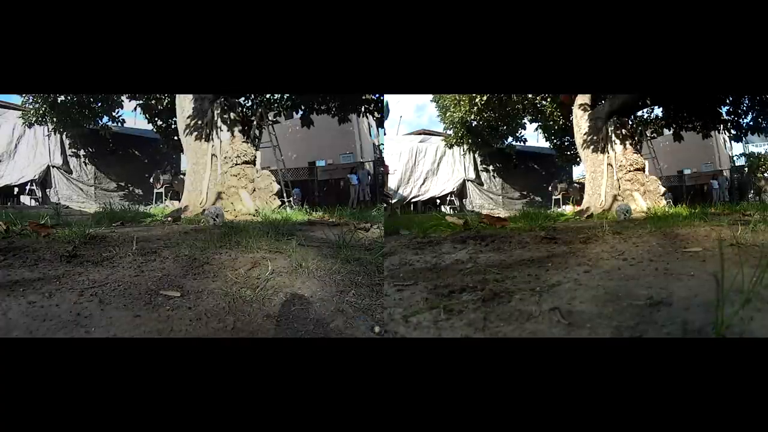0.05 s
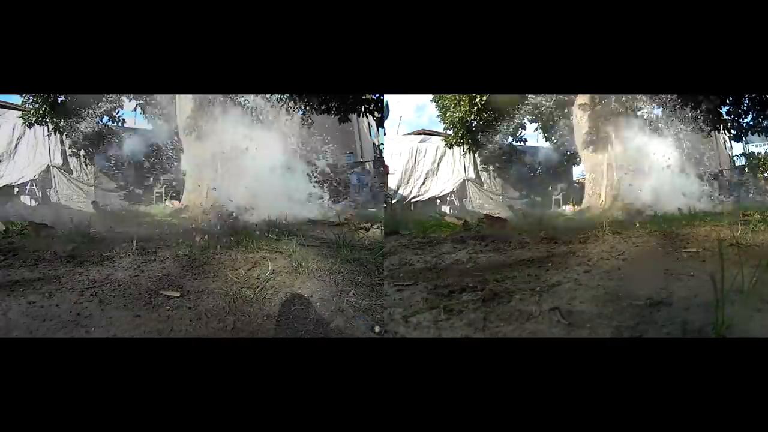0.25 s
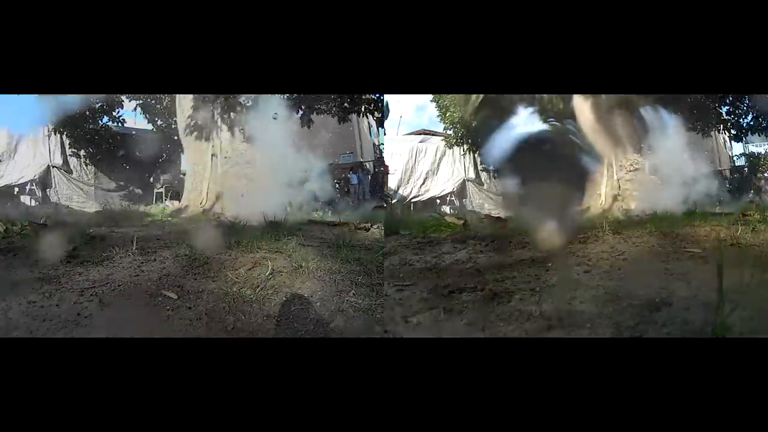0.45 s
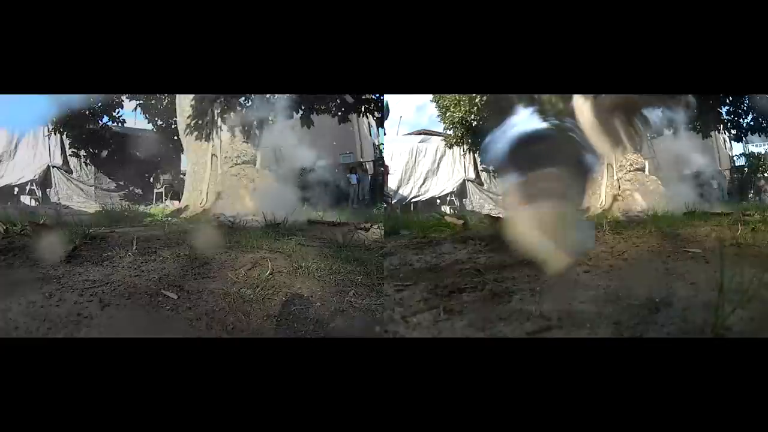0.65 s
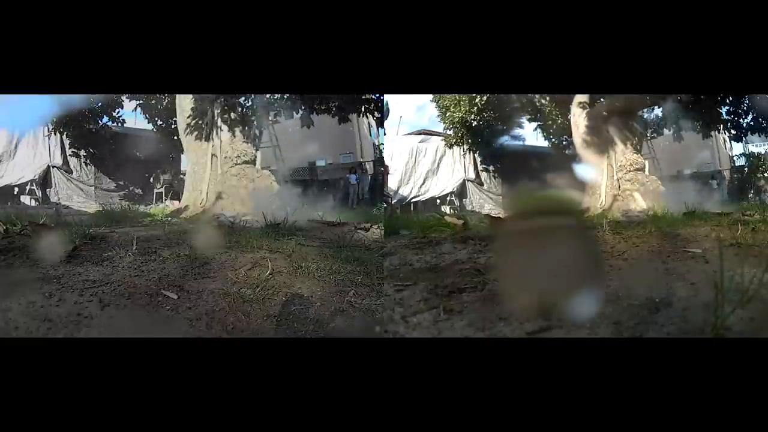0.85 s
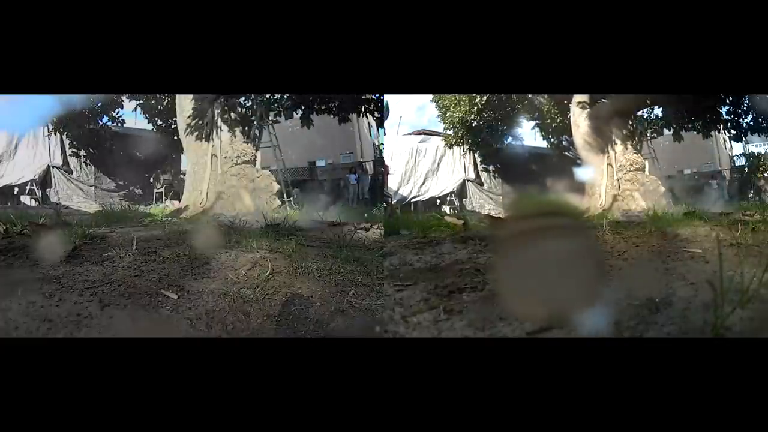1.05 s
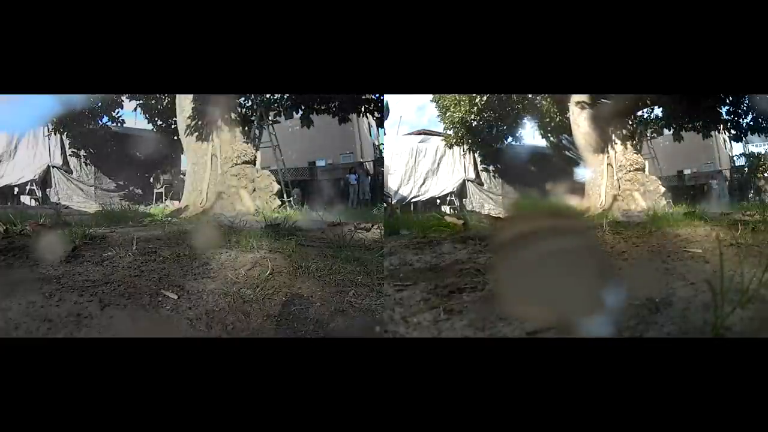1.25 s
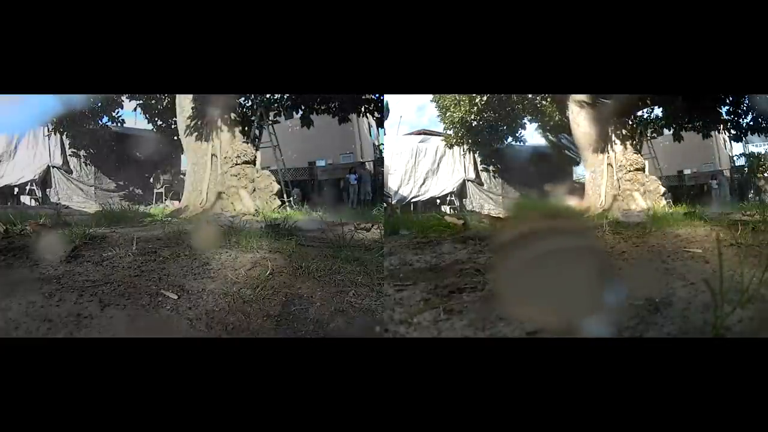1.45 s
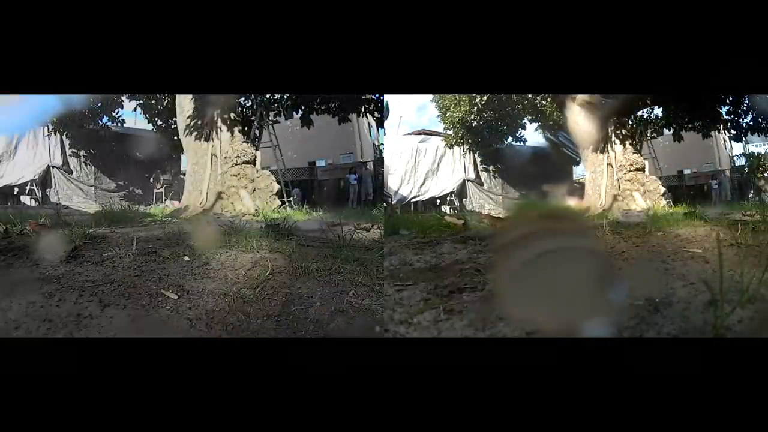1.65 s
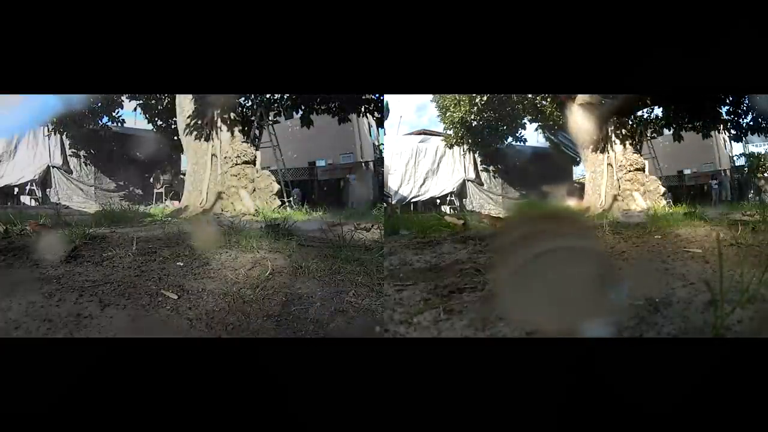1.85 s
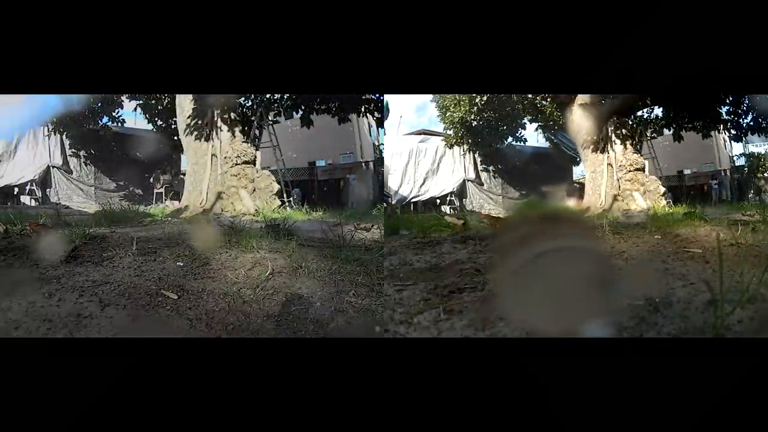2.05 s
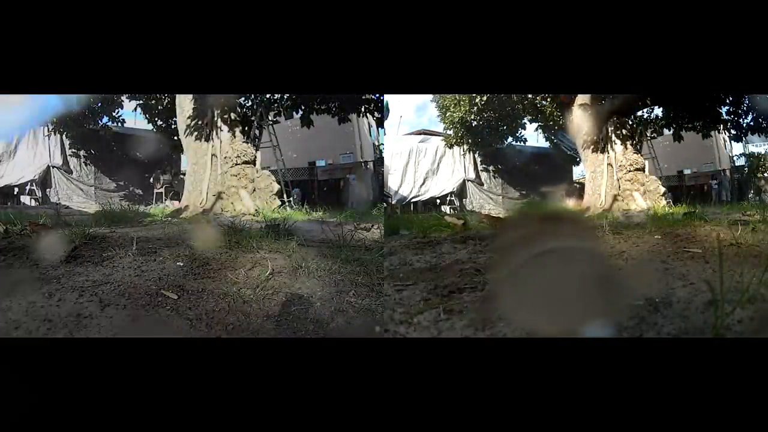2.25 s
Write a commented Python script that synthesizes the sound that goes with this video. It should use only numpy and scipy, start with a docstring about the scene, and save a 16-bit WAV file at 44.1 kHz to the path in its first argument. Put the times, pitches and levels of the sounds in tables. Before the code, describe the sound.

Quiet, faintly hissing yard air until 0.24 s, when a plastic bottle bursts in a very loud, clipped bang with a ringing, boxy edge. A crackling roar and water slap at 0.28 s fade by about 0.7 s over low rumble. Spray hisses while drops tap and click on the microphone housing, with small hollow scrapes and brighter ticks around 1.3-1.65 s, thinning to near silence after 2 s.

```python
"""A plastic bottle of dry ice bursts in a yard, heard inside a waterproof camera housing close by.
The pressure wave overloads a housing resonance; a crackling noise roar sags and dies away round the yard.
Slugs of water strike as low pushes under noise splashes; spray falls as a hiss with ringing droplets.
Drops and scraps click as damped modes, scraps tumble as resonant noise, and low booms and faint
sliding tones are sinusoids under bell-shaped envelopes. Rumble and quiet air are shaped noise."""
import sys
import numpy as np
from scipy import signal
from scipy.fft import rfft, irfft, next_fast_len
from scipy.io import wavfile
from scipy.ndimage import map_coordinates

SR = 44100
rng = np.random.default_rng(int(sys.argv[2]) if len(sys.argv) > 2 else 0)


def master_out(mix):
    """Clip the mix to full scale and print it as 16-bit PCM to the path in sys.argv[1]."""
    frames = np.transpose(np.atleast_2d(mix))
    ceiling = np.clip(frames, -1, 1)
    pcm = np.round(ceiling * 32767).astype(np.int16)
    wavfile.write(sys.argv[1], SR, pcm)


N = 101429
BURST_S, SLAM_S = 0.237, 0.2764  # the burst; the onset of spray and rumble


def amp(db):
    """Decibel law: level in dB to amplitude ratio."""
    return 10 ** (np.asarray(db) / 20)


def unit(x):
    """Normalization to an rms of 1."""
    return x / np.sqrt(np.mean(x ** 2) + 1e-20)


def clock():
    """Uniform sampling: the time of every sample in seconds."""
    return np.arange(N) / SR


def along(points, hz):
    """Interpolation of (frequency, value) points on a logarithmic frequency axis."""
    point_hz, value = np.transpose(points)
    return np.interp(np.log(hz + 1), np.log(point_hz + 1), value)


def wobble(rate):
    """Band-limited fluctuation: a smooth random curve with rate knots a second."""
    knots = rng.standard_normal(int(N * rate / SR) + 4)
    return map_coordinates(knots, [clock() * rate])


def filtered(x, response):
    """Linear filtering: the spectrum of x times a response of frequency."""
    m = next_fast_len(N + SR // 2)
    spectrum = rfft(x, m) * response(np.fft.rfftfreq(m, 1 / SR))
    return irfft(spectrum, m)[..., :N]


def rush(gain, alike):
    """Partly coherent stereo noise of rms 1, with a gain and a left-right correlation per frequency."""
    def mid_side_gain(hz):
        turn = np.arccos(np.clip(along(alike, hz), -1, 1)) / 2
        return gain(hz) * np.array([np.cos(turn), np.sin(turn)])

    mid, side = filtered(rng.standard_normal((2, N)), mid_side_gain)
    return unit(np.array([mid + side, mid - side]))


def colour(points):
    """Spectral shaping: gain per frequency from (pitch_hz, gain_db) points."""
    return lambda hz: amp(along(points, hz))


def resonances(rows):
    """Parallel second-order resonators: the summed response of (pitch_hz, width_hz, gain_db) rows."""
    return lambda hz: sum(amp(db) * 1j * hz * width / (centre ** 2 - hz ** 2 + 1j * hz * width)
                          for centre, width, db in rows)


def held(start, hold, t60):
    """Exponential decay after a sudden start and a hold; t60 is the time to fall 60 dB."""
    t = clock() - start
    return (t >= 0) * amp(-60 * np.maximum(t - hold, 0) / t60)


def hit_level(x):
    """Energy normalization: a hit carries the energy of 10 ms at rms 1."""
    return unit(x) * np.sqrt(SR / 100 / len(x))


TAP_ATTACK_S = 0.0004


def onset(t):
    """Exponential rise of a struck mode."""
    return 1 - np.exp(-t / TAP_ATTACK_S)


def ring(modes, t, rough=0.09):
    """Modal synthesis: damped sinusoids with new levels, phases and slight phase noise at each hit."""
    hz, db, t60 = np.transpose(modes)[:, :, None]
    steps = rng.standard_normal((len(hz), len(t)))
    drift = rough * np.cumsum(steps, axis=1) * np.sqrt(hz / SR) * 2 * np.pi
    decay = amp(db + rng.normal(0, 1.5, hz.shape) - 60 * t / t60)
    waves = decay * np.sin(2 * np.pi * (hz * t + rng.random(hz.shape)) + drift)
    return hit_level(waves.sum(axis=0) * onset(t))


def add(track, s, sound):
    """Superposition: mix a sound into a track at s seconds."""
    part = track[max(round(s * SR), 0):][:len(sound)]
    part += sound[:len(part)]


# Spectrum of the quiet air: pitch_hz, gain_db (relative, per Hz)
AIR_COLOUR = [(15, -32), (25, -7.5), (64, -8), (91, -11.5), (110, -4.5), (227, -7), (331, -9.5),
              (482, -13.5), (970, -22), (1660, -7), (2120, -18), (10600, -27), (15500, -62.5)]
AIR_DB = -54.5


def air():
    """Stationary coloured noise: the quiet air of the yard, more alike left and right in the bass."""
    return amp(AIR_DB) * rush(colour(AIR_COLOUR), [(100, 1.0), (1600, 0.2), (6000, 0.2)])


# Spectrum of the roar: pitch_hz, gain_db (relative, per Hz)
ROAR_COLOUR = [(24, -64.5), (40, -40), (166, -14.5), (207, -20), (294, -7), (535, -10.5), (591, -8.5),
               (973, -16), (1250, -17.5), (1560, 1.5), (2160, -13), (2390, -9.5), (4130, -24.5),
               (5170, -18), (6640, -34), (9890, -29.5), (11800, -60.5), (14000, -52), (15500, -47)]
# Left-right likeness of the roar and rumble: pitch_hz, correlation
ROAR_ALIKE = [(60, 1), (290, 0.63), (640, 0.25), (1000, 0.17), (1600, 0.89), (3100, .15), (5000, 0.17),
              (15000, 0.76)]
# Housing modes that the roar keeps ringing: pitch_hz, width_hz, gain_db
HOUSING_MODES = [(1591, 35, 2), (1693, 40, -9), (2420, 60, -16.5), (5130, 410, -22)]
# Spectrum of fine shreds and spray inside the roar: pitch_hz, gain_db (relative, per Hz)
CRACKLE_COLOUR = [(300, -30.5), (1500, 0.5), (2400, -1), (4000, -4.5), (5200, 5), (6500, -9.5),
                  (10000, -10.5), (12000, -34.5), (15000, -22.5)]
RING_HZ, RING_DB, RING_HOLD_S, RING_T60_S = 1603, -6.5, 0.006, 0.02
RING_DRIVE = 2  # overload of the first ring
RING_WAVER_RAD, RING_WAVER_PER_S = 0.3, 700  # phase unsteadiness and its knots a second
# the roar sags slowly, then falls
ROAR_DB, ROAR_HOLD_S, SAG_DB_PER_S, FALL_DB_PER_S = -10, 0.17, 29.5, 94
ROAR_TOP_DB, ROAR_RISE_S = -7, 0.012
HOUSING_DB, CRACKLE_PER_S, CRACKLE_DB = -5, 170, -12.5  # levels relative to the roar's noise


def first_ring():
    """Saturated resonance: the pressure wave overloads one housing mode, squaring its sinusoid."""
    phase = 2 * np.pi * RING_HZ * (clock() - BURST_S) + RING_WAVER_RAD * wobble(RING_WAVER_PER_S)
    overloaded = np.tanh(-RING_DRIVE * np.sin(phase)) / np.tanh(RING_DRIVE)
    return amp(RING_DB) * held(BURST_S, RING_HOLD_S, RING_T60_S) * overloaded


def roar():
    """Broadband noise excites the housing modes; random impulses crackle; saturation bounds the peaks."""
    t = clock() - BURST_S
    sag_db = SAG_DB_PER_S * np.clip(t, 0, ROAR_HOLD_S)
    fall_db = FALL_DB_PER_S * np.maximum(t - ROAR_HOLD_S, 0)
    level_db = ROAR_DB - sag_db - fall_db + 1.5 * wobble(130)
    housing = rush(resonances(HOUSING_MODES), ROAR_ALIKE) * amp([[1.2], [-1.2]])  # stronger on the left
    shreds = (rng.random((2, N)) < CRACKLE_PER_S / SR / 2) * rng.standard_normal((2, N))
    crackle = unit(filtered(shreds + 0.5 * shreds[::-1], colour(CRACKLE_COLOUR)))
    noise = unit(rush(colour(ROAR_COLOUR), ROAR_ALIKE) + amp(HOUSING_DB) * housing)
    noise = noise + amp(CRACKLE_DB) * crackle
    swell = (t > 0) * np.clip(t / ROAR_RISE_S, 0, 1)
    loud = swell * noise * amp(level_db) / amp(ROAR_TOP_DB)
    return amp(ROAR_TOP_DB) * loud / (1 + loud ** 4) ** (1 / 4)


def burst():
    """Superposition of the housing's first ring and the roar, slightly stronger on the left."""
    return (first_ring() + roar()) * amp([[0.6], [-0.6]])


# Spectrum of the yard's low rumble: pitch_hz, gain_db (relative, per Hz)
RUMBLE_COLOUR = [(25, -24.5), (60, -8), (130, -4), (300, -4), (600, -7.5), (1200, -36.5), (4000, -80)]
RUMBLE_DB, RUMBLE_HOLD_S, RUMBLE_T60_S = -39, 0.34, 0.73


def rumble():
    """Reverberant decay: the bass of the blast rolls on round the yard and outlasts the roar."""
    envelope = held(SLAM_S, RUMBLE_HOLD_S, RUMBLE_T60_S)
    return amp(RUMBLE_DB) * envelope * rush(colour(RUMBLE_COLOUR), ROAR_ALIKE)


# Dead spots of the housing's shell: pitch_hz, width_hz, gain_db
SHELL_DIPS = [(5960, 980, -5.5), (12100, 880, -26.5)]
SHELL_LOW_HZ = 720


def shell(x):
    """High-pass transmission: the stiff shell passes no bass from light hits and has treble dead spots."""
    x = signal.sosfilt(signal.butter(4, SHELL_LOW_HZ, 'high', fs=SR, output='sos'), x)
    return filtered(x, lambda hz: amp(sum(db * np.exp(-((hz - centre) / width) ** 2)
                                          for centre, width, db in SHELL_DIPS)))


# Spray falling on the ground: start_s, level_db
SPRAY_LEVEL = [(.3, -43), (.55, -26.5), (.73, -45), (.9, -38), (1.0, -45), (1.15, -46), (1.27, -43),
               (1.35, -42), (1.43, -41), (1.58, -40.5), (1.7, -45.5), (1.85, -54.5), (2.05, -60),
               (2.3, -72)]
# Spectrum of the spray: pitch_hz, gain_db (relative, per Hz)
WASH_COLOUR = [(35, -36), (60, -16.5), (152, -9.5), (253, -12), (810, -7.5), (976, -11.5), (1350, -13.5),
               (1590, 4.5), (2010, -17.5), (2410, -11.5), (4030, -22), (5080, -25.5), (7030, -37.5),
               (9510, -26), (12000, -49.5), (14100, -31.5), (15500, -36.5)]
# Left-right likeness of the spray and tumbling scraps: pitch_hz, correlation
WASH_ALIKE = [(100, 1), (500, .4), (1600, 0.55), (3000, .4), (10000, 0.39)]
# Resonances in the spray's hiss: pitch_hz, width_hz, gain_db
WASH_RINGS = [(527, 30, -12), (860, 40, -8), (1620, 58, -1)]
WASH_RING_DB = -3.5  # relative to the hiss


def wash(level_db):
    """Dense random impacts merge into coloured noise: fine spray hisses on the ground."""
    rings = rush(resonances(WASH_RINGS), WASH_ALIKE)
    hiss = unit(rush(colour(WASH_COLOUR), WASH_ALIKE) + amp(WASH_RING_DB) * rings)
    return hiss * amp(level_db + 2.1 * wobble(44.87)) * (clock() > SLAM_S)


# Housing modes of a click: pitch_hz, level_db (relative), t60_s
CLICK = [(3620, -1.5, 0.019), (4430, -1.5, 0.0098), (5157, 2.5, 0.013), (6000, -4.5, 0.013),
         (7200, -1, 0.0097), (8400, -10, .008)]
# Housing modes of a sparkle: pitch_hz, level_db (relative), t60_s
SPARKLE = [(8400, -1.5, 0.012), (9440, 1, 0.02), (9810, -2.5, 0.026), (10260, -4.5, 0.02),
           (14400, -3.5, 0.019), (14170, 0.5, .018)]
DROPLETS_PER_S = 55  # taken over the whole length, then packed in after SLAM_S
DROPLET_DB, DROPLET_SPREAD_DB = -51.5, 5.5
DROPLET_FOLLOWS = 0.43  # share of the spray's level changes, in dB


def droplets(level_db):
    """Randomly timed modal impacts: stray droplets tick on the housing, louder in heavier spray."""
    ticks, t = np.zeros(N), np.arange(SR // 32) / SR
    for place, size, pitch in rng.random((int(DROPLETS_PER_S * N / SR), 3)):
        s = SLAM_S + place * (N / SR - SLAM_S)
        db = DROPLET_DB + DROPLET_SPREAD_DB * min(-np.log(size), 2)
        db += DROPLET_FOLLOWS * (level_db[int(s * SR)] - level_db.max())
        tick = ring([(1800 + 1200 * pitch, 0, 0.012)], t)
        tick = tick + amp(-7.5) * ring(SPARKLE, t) + amp(-6.5) * ring(CLICK, t)
        add(ticks, s, amp(db) * tick)
    return shell(ticks)


def spray():
    """Superposition of merged impacts on the ground and separate impacts on the housing."""
    level_db = np.interp(clock(), *np.transpose(SPRAY_LEVEL))
    return wash(level_db) + droplets(level_db)


# Slugs of water on the housing: start_s, push_db (before shaping), splash_db, hold_s
SLUGS = [(0.2769, -1.5, -5, 0.0058), (0.48, -26, -22, 0.011), (0.556, -42, -25, .003),
         (0.6783, -48, -33.5, 0.012)]
# Spectrum of a splash: pitch_hz, gain_db (relative, per Hz)
SPLASH_COLOUR = [(35, -29.5), (60, -17), (196, -4.5), (773, -3), (1630, -0.5), (1910, -15.5), (3760, -6),
                 (4220, -31.5), (9510, -14.5), (11500, -29.5), (15500, -19.5)]
PUSH_S, PUSH_DELAY_S, SPLASH_T60_S = 0.0026, 0.0016, 0.04


def slam():
    """Transient loading: each slug of thrown water gives one low push under a short splash."""
    splash = rush(colour(SPLASH_COLOUR), [(200, 1.0), (3000, 0.68)])
    track = 0
    for s, push_db, splash_db, hold in SLUGS:
        u = np.maximum(clock() - s - PUSH_DELAY_S, 0) / PUSH_S
        pulse = (1 - u) * np.exp(-u) * (1 - np.exp(-u / 0.08))  # swings once through zero
        push = -2 * amp(push_db) * pulse
        track = track + push + amp(splash_db) * held(s, hold, SPLASH_T60_S) * splash
    return track


# Drops and scraps on the housing, levels before the shell:
# start_s, ring_db, pitch_hz (reference for the partials), knock_db, click_db, sparkle_db
TAPS = [(0.4016, -40, 1640, -24.5, -44, -54), (0.423, -35, 1640, -41, -25, -57),
        (0.4417, -35, 1630, -46, -24, -51), (0.4577, -20, 1720, -25, -26, -29.5),
        (0.489, -32, 1840, -41, -25, -51), (0.5365, -29, 1580, -39, -54, -41),
        (0.5501, -20, 1660, -28, -26.5, -61), (0.568, -47, 1560, -49, -48, -41),
        (0.6125, -32, 1680, -61, -35, -40), (0.6344, -33.5, 2040, -61, -61, -45),
        (0.6583, -33.5, 1630, -52, -60, -50), (0.6769, -16, 1600, -50, -68, -65),
        (0.689, -46, 2320, -46, -61, -58), (0.774, -38, 2170, -53, -58, -49),
        (0.8142, -33, 2094, -40, -42, -41.5), (0.893, -58, 1700, -51, -45, -64),
        (0.966, -43.5, 1820, -58, -64, -56), (1.0037, -45, 2030, -59, -59, -55),
        (1.0233, -37, 2110, -44, -45.5, -46), (1.0679, -38, 2214, -57, -47, -46),
        (1.0965, -45, 1550, -57, -44, -56), (1.1378, -32, 1630, -54, -28.5, -39.5),
        (1.187, -41, 1580, -53, -53.5, -73.5), (1.2212, -41, 1740, -57, -47.5, -49),
        (1.2324, -34.5, 1540, -41, -59, -57), (1.2513, -35, 1710, -37, -55, -45),
        (1.2702, -36, 2020, -35.5, -59, -45), (1.283, -36, 1660, -59, -59, -55.5),
        (1.3283, -18.5, 2550, -37, -38.5, -26.5), (1.3884, -35.5, 2220, -49, -61, -45.5),
        (1.3982, -35.5, 1650, -40.5, -57, -49), (1.4299, -25, 2217, -53, -48, -34.5),
        (1.4314, -29.5, 2386, -37.5, -29.5, -39.5), (1.45, -50, 1830, -44, -67, -51.5),
        (1.5243, -27, 2320, -60, -40, -36), (1.553, -30, 1824, -57, -37.5, -61),
        (1.6066, -31.5, 2230, -61.5, -47, -41.5), (1.623, -37, 2360, -66, -43, -42),
        (1.6447, -19.5, 2015, -47, -40, -29.5), (1.668, -40.5, 2430, -45.5, -49.5, -48),
        (1.7141, -42, 2120, -66, -56, -51.5), (1.7352, -39.5, 2420, -70, -44.5, -47.5),
        (1.7772, -49.5, 1870, -63, -57, -60.5), (1.8035, -40, 2020, -43, -44.5, -47.5),
        (1.835, -47, 1700, -79, -54, -74), (1.9711, -48.5, 2140, -55, -54, -58),
        (2.0007, -53, 2450, -70, -65, -60.5), (2.0427, -53, 2450, -70.5, -63, -61),
        (2.074, -53, 2300, -69, -60, -63), (2.163, -54.5, 1920, -69, -71, -66)]
# Housing modes of a knock: pitch_hz, level_db (relative), t60_s
KNOCK = [(840, -8, .014), (1058, 8.5, 0.014), (1330, -0.5, 0.032)]
# Spectrum of the crack in each tap: pitch_hz, gain_db (relative)
CRACK_COLOUR = [(100, 1.5), (600, -30), (1500, 21.5), (3000, 25.5), (6000, -31.5), (10000, -19),
                (12000, -26), (15000, -14)]
CRACK_DB, CRACK_T60_S = -10.5, 0.014  # level relative to the ring
TAP_T60_S = 0.013
AFTER_HZ, AFTER_DB, AFTER_T60_S = 1608, -10, 0.06  # lingering resonance, relative to the ring
REBOUND_S, REBOUND_DB = 0.002705, -8  # each drop flattens and strikes a second time


def taps():
    """Impact excitation: each hit gives a pitched ring, knock, click and sparkle, alike in both ears."""
    track, t = np.zeros(N), np.arange(SR // 16) / SR
    grit = rush(colour(CRACK_COLOUR), [(1000, 0.79)])[0]
    for s, db, hz, knock_db, click_db, sparkle_db in TAPS:
        piece = grit[round(s * SR):][:len(t)]
        crack = hit_level(piece * amp(-60 * t / CRACK_T60_S) * onset(t))
        partials = [(hz * 0.576, -9, TAP_T60_S), (hz * 0.91, -3, TAP_T60_S), (hz * 1.071, 0, TAP_T60_S)]
        after = ring([(AFTER_HZ, 0, AFTER_T60_S)], t, rough=0.03)
        hit = amp(db) * (ring(partials, t) + amp(CRACK_DB) * crack + amp(AFTER_DB) * after)
        hit = hit + amp(knock_db) * ring(KNOCK, t)
        hit = hit + amp(click_db) * ring(CLICK, t, rough=0.12)
        hit = hit + amp(sparkle_db) * ring(SPARKLE, t)
        add(track, s, hit)
        add(track, s + REBOUND_S, amp(db + REBOUND_DB) * ring(partials, t))
    return shell(track)


# Low booms after the burst: centre_s, level_db (rms at the centre), length_s (centre to 1/e)
BOOMS = [(0.448, -40.5, .06), (0.598, -43, 0.047), (.74, -52, 0.031), (.89, -49, 0.027),
         (1.06, -55.5, 0.052), (1.216, -47.5, .03), (1.452, -41, 0.038), (1.57, -54.5, 0.032)]
BOOM_HZ = 134


def booms():
    """Amplitude modulation: bell-shaped swells of one low, phase-wavering sinusoid."""
    t = clock()
    swell = sum(amp(db) * np.exp(-((t - s) / length) ** 2) for s, db, length in BOOMS)
    return np.sqrt(2) * swell * np.sin(2 * np.pi * BOOM_HZ * t + 0.5 * wobble(14))


# Faint sliding tones: centre_s, length_s (standard deviation), pitch_hz (at the centre),
# glide_hz_per_s, level_db (rms at the centre, before its wobble)
TONES = [(.85, .02, 1180, -500, -50), (0.913, .025, 715, -1400, -43.5)]


def tones():
    """Linear frequency modulation: two faint tones slide down under bell-shaped envelopes."""
    track = np.zeros(N)
    for s, length, hz, glide, db in TONES:
        d = clock() - s
        envelope = amp(db + 2.8 * wobble(90)) * np.exp(-(d / length) ** 2 / 2)
        phase = 2 * np.pi * (hz + glide * d / 2) * d + 0.68 * wobble(130)
        track = track + envelope * np.sin(phase)
    return np.sqrt(2) * track


# Scraps tumbling on the ground: start_s, level_db, hold_s, t60_s
TUMBLES = [(0.889, -45, .04, .1), (1.045, -47.5, 0.074, 0.085), (1.181, -43.5, 0.015, 0.12),
           (1.393, -33, 0.015, 0.06), (1.441, -41, 0.033, 0.17)]
# Hollow resonances of the scraps: pitch_hz, width_hz, gain_db
TUMBLE_MODES = [(384, 62, -7.5), (523, 45, -9), (836, 66, -1.5), (1080, 90, -16), (1197, 63, -1),
                (1595, 96, -4.5)]
TUMBLE_TOP_HZ = 2580


def tumbles():
    """Noise-driven resonance: scraps of the bottle land with a short hollow scrape."""
    def hollow(hz):
        return resonances(TUMBLE_MODES)(hz) / (1 + (hz / TUMBLE_TOP_HZ) ** 4)

    envelope = sum(amp(db) * held(s, hold, t60) for s, db, hold, t60 in TUMBLES)
    return rush(hollow, WASH_ALIKE) * envelope


def scene():
    """Linear superposition of every source over the quiet air."""
    return air() + burst() + rumble() + spray() + slam() + taps() + booms() + tones() + tumbles()


CEILING, TOP_HZ = 0.98, 15660


def record(dry):
    """Saturation and band limiting: peaks bend smoothly to a ceiling, then a steep low-pass acts."""
    clipped = dry / (1 + np.abs(dry / CEILING) ** 8) ** (1 / 8)
    return filtered(clipped, lambda hz: 1 / (1 + (hz / TOP_HZ) ** 90))


dry = scene()
out = record(dry)
master_out(out)
```